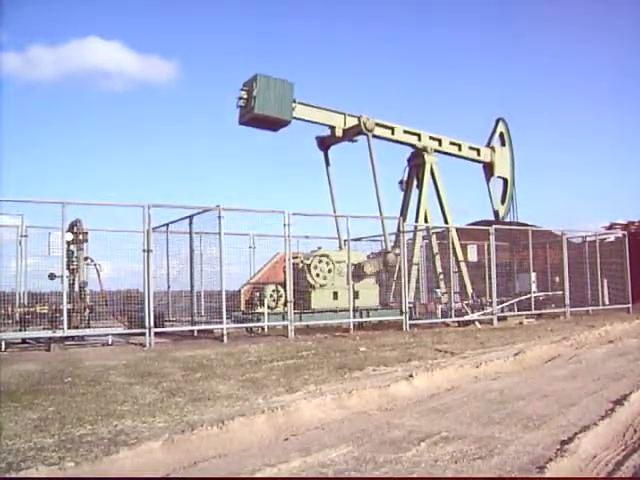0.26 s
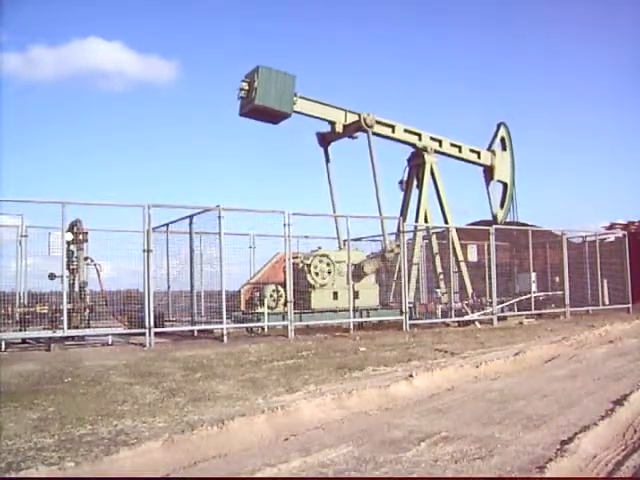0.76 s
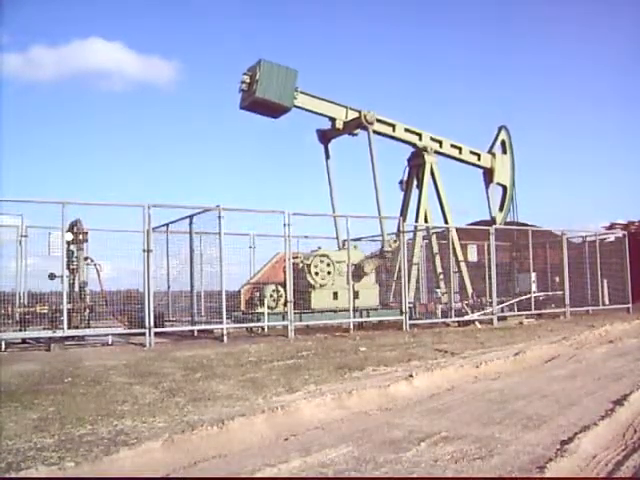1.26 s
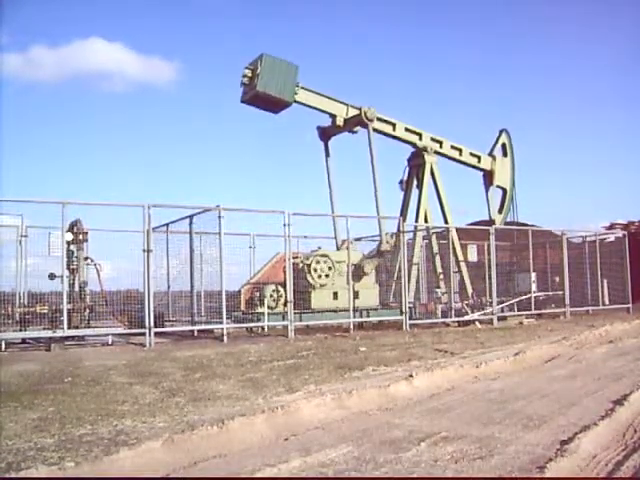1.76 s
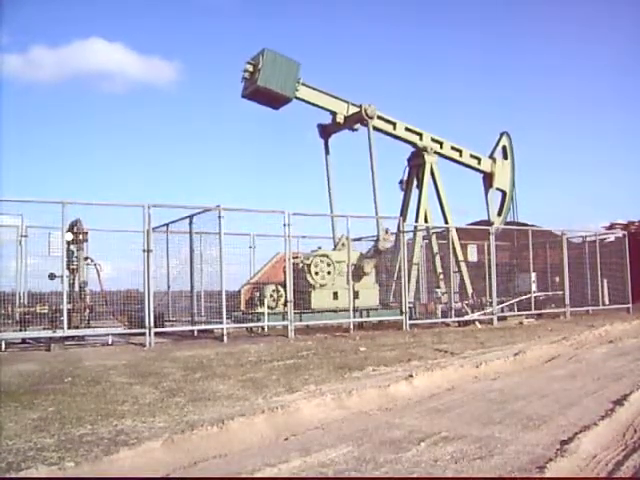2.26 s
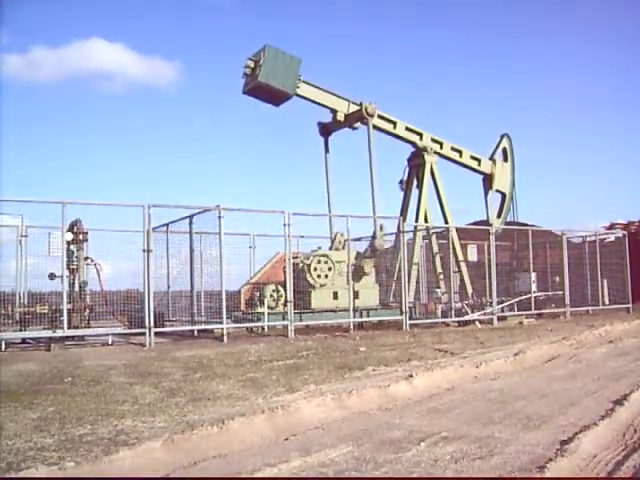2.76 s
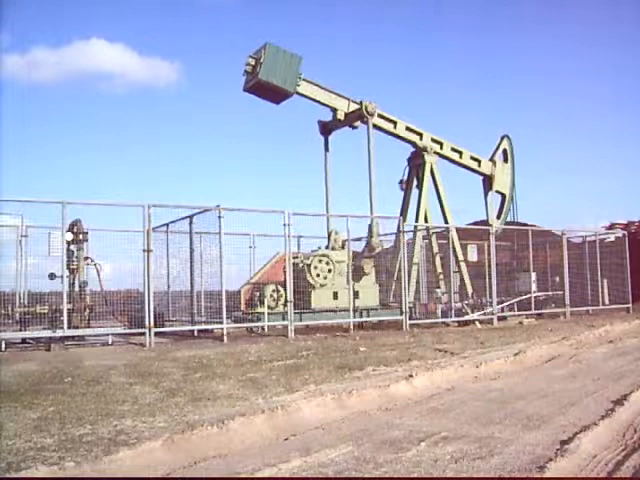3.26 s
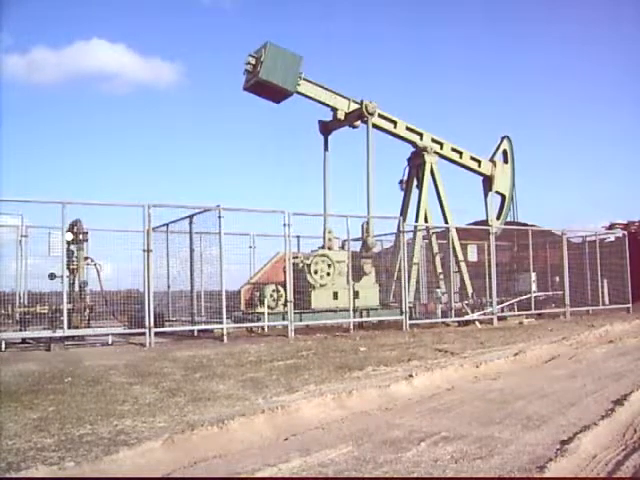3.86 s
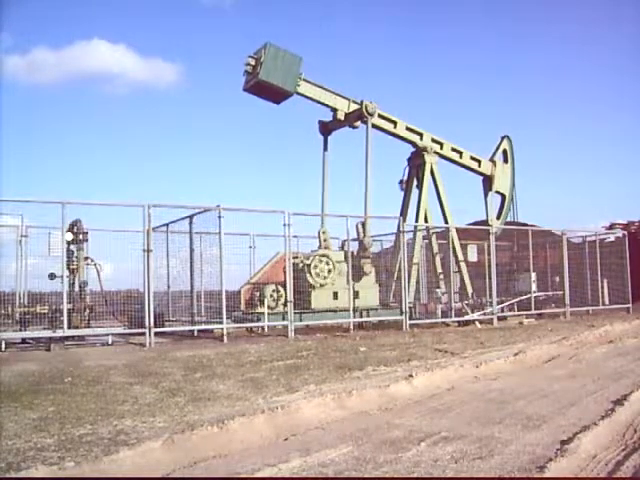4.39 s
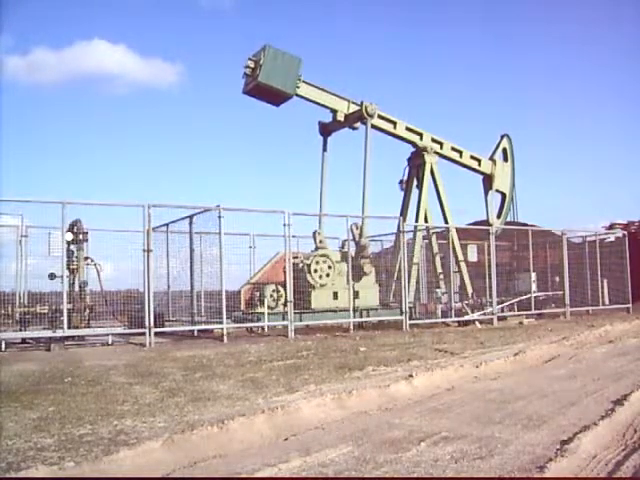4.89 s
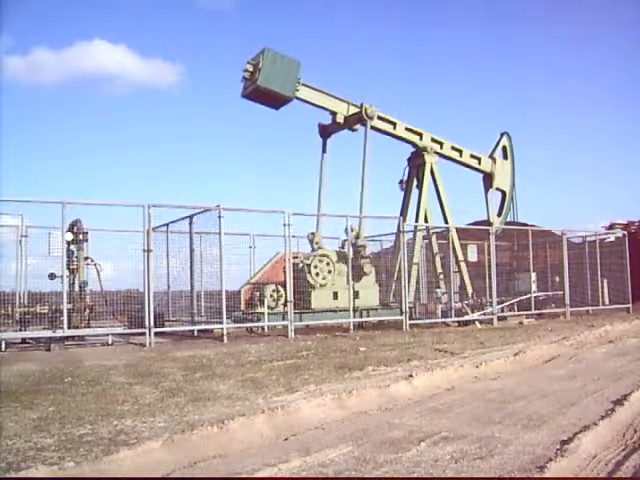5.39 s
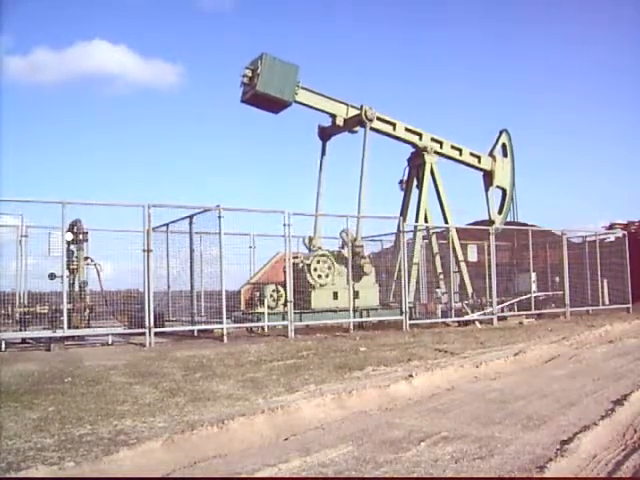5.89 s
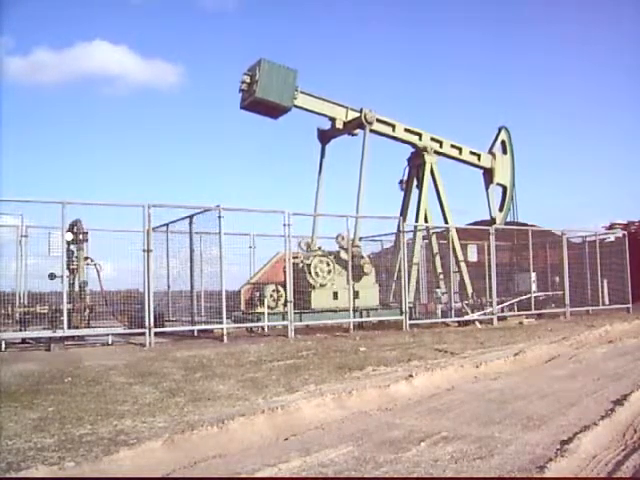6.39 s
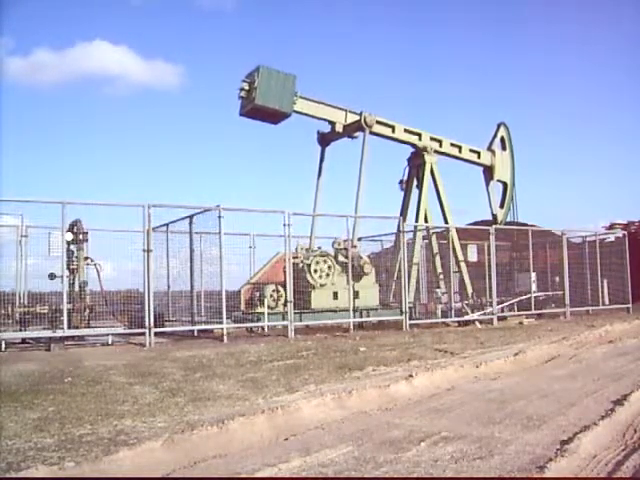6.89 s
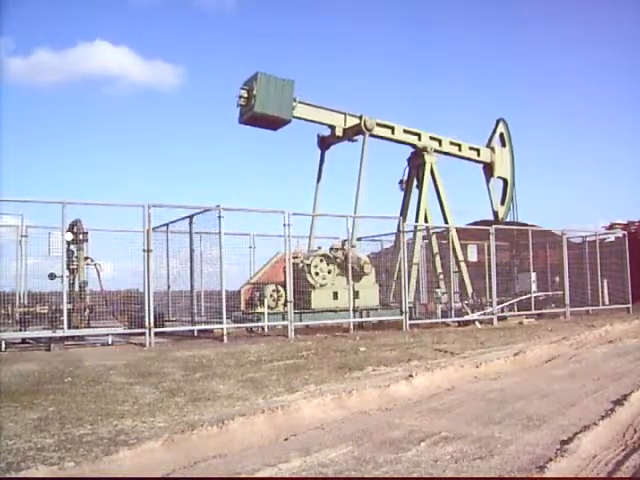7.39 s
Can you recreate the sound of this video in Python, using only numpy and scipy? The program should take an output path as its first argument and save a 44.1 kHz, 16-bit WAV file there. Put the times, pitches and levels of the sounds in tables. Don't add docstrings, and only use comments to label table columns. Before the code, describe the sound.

A pumpjack engine idles in rapid, even knocks over a gear whine and exhaust wash, while wind thumps the microphone and a lark whistles faintly.

```python
import sys
import numpy as np
from scipy import signal
from scipy.fft import rfft, irfft
from scipy.io import wavfile
from scipy.ndimage import uniform_filter1d

SR = 44100
rng = np.random.default_rng(int(sys.argv[2]) if len(sys.argv) > 2 else 0)


def wav_out(sig):
    wavfile.write(sys.argv[1], SR, np.round(np.clip(np.atleast_2d(sig).T, -1, 1) * 32767).astype(np.int16))


def field_ratio(decibels):
    return 10 ** (np.asarray(decibels, dtype=float) / 20)


N = 337365
T = np.arange(N) / SR

CYCLE_START_S, CYCLE_S, SLOWING_S = -.00098, .155957, 1.8e-7

# middle in seconds, level in dB, pitch in Hz.
LARK_NOTES = [(0.712, -57, 4272), (0.93, -55, 4988), (0.975, -62.4, 4650), (1.018, -62, 6201),
              (1.034, -56, 4630), (1.077, -59, 4960), (1.442, -59, 4851), (1.49, -61.4, 4658),
              (1.535, -72, 4851), (2.12, -58, 5000), (2.519, -63, 6200), (2.528, -63, 4272),
              (2.635, -59, 5016), (2.791, -60, 5043), (4.324, -57.5, 4382), (4.456, -53, 3445),
              (4.51, -61, 5060), (5.569, -61, 6118), (5.71, -56, 4272), (5.909, -60, 5016),
              (6.025, -62, 6229), (6.156, -64.9, 6200), (6.619, -56, 4272), (6.683, -62.0, 4940)]
TRILL_HZ = [4360, 4650, 4930, 6180]
# time in seconds, level in dB.
BREEZE = [(0.0, -20.5), (0.3, -34), (1.11, -32), (2.36, -40.5), (3.81, -37.5), (4.71, -42), (7.65, -36)]
# middle in seconds, length in seconds, level in dB.
GUSTS = [(0.044, .04, -23), (0.114, .14, -21.5), (0.301, .1, -24.5), (0.836, .14, -23.5),
         (.94, 0.042, -27.5), (1.025, .06, -26), (1.249, 0.23, -30), (1.389, 0.079, -29),
         (1.488, 0.071, -29), (1.954, 0.12, -24), (2.036, .1, -24.5), (2.178, .08, -32),
         (2.526, 0.15, -30.5), (2.742, .07, -30), (2.91, .1, -24), (3.036, 0.19, -24.5), (3.302, 0.1, -34),
         (3.58, .16, -25.5), (3.715, 0.089, -19.5), (3.856, 0.065, -27.5), (3.958, 0.081, -29),
         (4.081, .12, -24.5), (4.317, 0.08, -29), (4.471, 0.042, -31)]
# frequency in Hz, level in dB per Hz.
WIND_COLOUR = [(8, -30), (26, 0.5), (46, 1), (65, -6.5), (100, -8), (200, -13.5), (400, -26), (800, -60)]
# time in seconds, level in dB, pitch in Hz.
POPS = [(0.003, -11.5, 66.8), (0.07, -12.5, 514), (0.072, -22.5, 950), (0.076, -5.5, 213),
        (0.062, -11, 110), (0.089, -10.5, 90.4), (0.1, -7.5, 307), (0.115, -13, 54), (0.245, -18, 156),
        (0.313, -17.5, 39.5), (0.814, -16.5, 230), (0.852, -23, 283), (1.193, -19.5, 149),
        (1.216, -17.5, 118), (1.818, -15.5, 207), (1.977, -17, 194), (1.977, -21, 487), (1.993, -18, 271),
        (2.028, -22, 85.5), (3.018, -15.5, 109), (3.055, -19, 60), (3.594, -22.5, 152), (3.622, -14, 350),
        (3.696, -17, 194), (3.701, -19.5, 360), (3.72, -23, 306), (3.72, -21.5, 78), (4.082, -17.5, 160),
        (4.108, -21.5, 239), (4.12, -18.5, 486)]
# time in seconds, peak in dB, build-up and recovery in seconds.
SLAPS = [
    (0.0691, -3, 0.002, 0.0008),
    (0.0722, 3.5, 0.002, 0.0018),
    (0.1024, -7, 0.0013, 0.0013),
    (0.7864, -4, 0.0025, 0.0052),
    (2.923, -4.5, 0.0023, 0.0091),
    (3.6266, -5.5, 0.005, .008),
    (4.123, -11.5, 0.0045, 0.0058),
]
# frequency in Hz, level in dB per Hz.
WASH_COLOUR = [(25, -56), (60, -58), (100, -61), (130, -57), (200, -57), (400, -61.5), (560, -63),
               (800, -68), (1000, -73.5), (1320, -80), (1450, -85), (2100, -87), (3000, -88), (5000, -90.5),
               (7500, -95.5)]
# milliseconds into the cycle, level in dB.
PUFF = [(0, 0), (40, -1), (60, -1.45), (90, -0.5), (128, -1.5), (134, 0.5), (156, -2.5)]
# time in seconds, level in dB.
GEAR_LEVEL = [(0, -45), (.5, -48.8), (1.4, -45.5), (2.05, -47.3), (3.25, -42.5), (4.25, -43.8), (5, -48),
              (5.6, -45.3), (6.1, -48.3), (7, -44.2), (7.65, -43.5)]
# frequency in Hz, width in Hz, level in dB.
HOUSING = [(129.5, 6.7, -44.5), (194, 7, -53), (468.7, 10, -51.5), (749, 6.9, -46.5), (1491, 33, -62.5),
           (2072, 40, -70.5), (2752, 150, -63.5), (4800, 120, -71)]
# start in seconds, length in seconds, pitch in Hz, level in dB.
SWELLS = [
    (4.34, 0.16, 1920, -60),
    (4.49, 0.091, 1890, -57),
    (4.57, 0.053, 1940, -56),
    (4.67, 0.075, 1920, -54),
    (6.84, 0.086, 147.5, -38),
    (6.91, 0.07, 149, -38.5),
    (7.2, 0.11, 140.5, -39),
    (7.34, 0.088, 146.6, -34.5),
    (7.48, 0.1, 144.4, -32.5),
]
# time in seconds, level in dB, seconds to fade by 60 dB.
CLANKS = [
    (1.2765, -43, .13),
    (1.3758, -37.5, .17),
]
# frequency in Hz, level in dB.
LINK_MODES = [(1770, 3.5), (2270, 3), (2970, -3), (3480, -1.5), (4220, -6.5), (5200, -11.5), (6720, -9.5)]
# milliseconds into the cycle, level in dB, block ring in Hz,
# head ring in dB, exhaust thump in Hz.
FIRINGS = [
    (7, -35, 790, -41, 260),
    (31, -26.5, 630, -41, 340),
    (55, -30, 800, -46, 270),
    (81, -30, 960, -43, 230),
    (106, -31, 700, -46, 250),
    (133, -35, 1020, -45, 430),
]
# milliseconds into the cycle, level in dB, ring in Hz.
TAPPETS = [
    (22, -31, 400),
    (82, -32, 310),
    (91, -38, 1080),
    (100, -33, 1030),
    (108, -30, 470),
    (151, -42, 1230),
    (0, -36, 930),
    (152, -29, 230),
]
# frequency in Hz, level in dB per Hz.
RATTLE_COLOUR = [(60, -28), (150, -8), (300, -4.5), (800, -4.5), (1200, -16), (1500, -30.5), (2100, -28),
                 (3000, -41), (5000, -65)]
# multiple of the cycle rate, peak in dB.
ORDER_DB = [(24, -41.5), (38, -40.2), (39, -42.8), (51, -41.8), (59, -40.2), (68, -42.8), (99, -47.2),
            (100, -44.9), (109, -41.4), (115, -43.2), (120, -43.9), (130, -45.0), (132, -44.6),
            (136, -46.0), (144, -50.1), (156, -52.4), (162, -49.2), (171, -51.0), (190, -55.1),
            (191, -56.2), (196, -55.6), (197, -56.0), (225, -67.8), (231, -66.1), (268, -67.0),
            (275, -68.3), (317, -66.3), (319, -67.2), (325, -67.6)]
# frequency in Hz, level in dB.
ELECTRONIC_WHINE = [(7790, -73.5), (7892, -79.5)]
# frequency in Hz, level in dB.
ROLL_OFF = [(20, -1), (7000, 1), (7600, 1), (8000, -1.5), (8400, -11), (8800, -25.5), (9100, -53.5)]


def evened(x):
    return x / np.sqrt(np.mean(x ** 2) + 1e-20)


def read(points, hz):
    f, value = np.transpose(points)
    return np.interp(np.log(hz + 1), np.log(f + 1), value)


def colour(x, points):
    x = np.pad(x, 2048, "reflect")
    gain = field_ratio(read(points, np.fft.rfftfreq(len(x), 1 / SR)))
    return irfft(rfft(x) * gain, len(x))[2048:-2048]


def smooth_noise(size):
    return evened(uniform_filter1d(rng.standard_normal(N), size=size))


def add(mix, s, sound):
    at = round(s * SR)
    sound = sound[max(-at, 0):]
    part = mix[max(at, 0):][:len(sound)]
    part += sound[:len(part)]


def fuzzy(hz, width):
    r = np.exp(-np.pi * width / SR)
    noise = rng.standard_normal(N) + 1j * rng.standard_normal(N)
    slow = signal.lfilter([1], [1, -r], noise)
    return evened((slow * np.exp(2j * np.pi * hz * T)).real)


def burst(hz, rise_s, fall_s, phase):
    t = np.arange(-3 * rise_s, 4 * fall_s, 1 / SR)
    shape = np.exp(-.5 * (t / np.where(t < 0, rise_s, fall_s)) ** 2)
    return shape * np.cos(2 * np.pi * hz * t + phase), -t[0]


def cycle_share():
    k = np.arange(-1, N / SR / CYCLE_S + 2)
    starts = CYCLE_START_S + CYCLE_S * k + SLOWING_S * k ** 2
    return np.interp(T, starts, k) % 1


def lark():
    faint = []
    for when, b, pick in rng.random((60, 3)):
        hz = TRILL_HZ[int(pick * len(TRILL_HZ))] * (1.1 + 0.018 * b)
        faint.append((N / SR * when, -66 - 4 * b, hz))
    out, t = np.zeros(N), np.arange(-.016, .016, 1 / SR)
    for s, db, hz in [*LARK_NOTES, *faint]:
        slide = hz * (1 + rng.uniform(-0.45, 0.89) * t)
        whistle = np.sin(2 * np.pi * np.cumsum(slide) / SR)
        add(out, s + t[0], field_ratio(db + 3) * np.hanning(len(t)) * whistle)
    return out


def wind():
    gusts = np.zeros(N)
    for s, length, db in GUSTS:
        add(gusts, s - length / 2, field_ratio(db) * np.sqrt(np.hanning(round(length * SR))))
    force = field_ratio(np.interp(T, *np.transpose(BREEZE)) + 1.0) + gusts
    lumpy = rng.standard_normal(N) * field_ratio(3.3 * smooth_noise(1200))
    out = force * evened(colour(lumpy, WIND_COLOUR))
    eddies = [(s, field_ratio(db + 2.5), hz) for s, db, hz in POPS]
    eddies_per_s, low_hz, high_hz = 90, 150, 700
    for when, b, c in rng.random((round(eddies_per_s * N / SR), 3)):
        size = gusts[int(when * N)] * field_ratio(-1 - 8.0 * b - 4.6 * c)
        eddies.append((when * T[-1], size, low_hz * (high_hz / low_hz) ** c))
    for s, size, hz in eddies:
        push, lead = burst(hz, 0.0022 + 0.027 / hz, 0.0026 + 0.16 / hz, rng.uniform(0, 2 * np.pi))
        add(out, s - lead, size * push)
    return out


def slaps():
    out, t = np.zeros(N), np.arange(-.07, .07, 1 / SR)
    for s, db, build_s, back_s in SLAPS:
        drop = -np.tanh(t / (0.28 * build_s))
        fade = np.exp(-abs(t) / np.where(t < 0, build_s, back_s))
        add(out, s + t[0], field_ratio(db) * drop * fade)
    return out


def wash():
    frames, bins = N // 128 + 5, 257
    a, b, patches = rng.standard_normal((frames, bins, 3)).T
    patches = uniform_filter1d(patches, size=6, axis=0)
    patches = evened(uniform_filter1d(patches, size=20, axis=1))
    flicker = rng.standard_normal(frames)
    spectra = (a + 1j * b) * field_ratio(1.02 * patches + 1.0 * flicker)
    noise = signal.istft(spectra, nperseg=512, noverlap=384)[1][:N]
    noise = evened(noise) * np.sqrt(SR / 2)
    low = signal.sosfiltfilt(signal.butter(2, 1400, fs=SR, output="sos"), noise)
    ms = 1000 * CYCLE_S * cycle_share()
    breath = field_ratio(np.interp(ms, *np.transpose(PUFF)))
    return colour(low + (noise - low) * breath, WASH_COLOUR)


def gearbox():
    hz = 598.9 + .6 * smooth_noise(9000)
    whine = np.sqrt(2) * np.sin(2 * np.pi * np.cumsum(hz) / SR)
    hum = sum(field_ratio(db) * fuzzy(hz, width) for hz, width, db in HOUSING)
    return whine * field_ratio(np.interp(T, *np.transpose(GEAR_LEVEL))) + hum


def bearing_and_frame():
    out = np.zeros(N)
    for s, length, hz, db in SWELLS:
        size = round(length * SR)
        noise = rng.standard_normal((2, size))
        drift, flicker = uniform_filter1d(noise, size=round(30 * SR / hz) // 2, axis=1)
        shape = np.hanning(size) ** 0.65 * field_ratio(db + 5 + 3.5 * evened(flicker))
        wavering_hz = hz * (1 + .012 * evened(drift))
        add(out, s, shape * np.sin(2 * np.pi * np.cumsum(wavering_hz) / SR))
    return out


def loose_link():
    out, t = np.zeros(N), np.arange(SR // 3) / SR
    for s, db, t60 in CLANKS:
        modes = sum(field_ratio(d) * np.sin(2 * np.pi * (hz * t + rng.random())) for hz, d in LINK_MODES)
        scatter = colour(rng.standard_normal(len(t)), [(900, -50), *LINK_MODES, (9000, -31.5)])
        ring = 0.48 * evened(modes) + 0.59 * evened(scatter)
        attack = np.minimum(t / .001, 1)
        add(out, s - .004, field_ratio(db - 60 * t / t60) * ring * attack)
    return out


def valve():
    since = (cycle_share() * CYCLE_S - .1327) % CYCLE_S
    later = (since - .078) % CYCLE_S
    tick = field_ratio(-34.5) * np.exp(-since / .0013) * np.sin(2 * np.pi * 1850 * since)
    chuff_colour = [(1000, -33.0), (1500, 5.5), (2050, 10.5), (2500, -12.5), (5000, -8.0), (8000, -26.5)]
    chuff = evened(colour(rng.standard_normal(N), chuff_colour))
    fade = np.exp(-since / .04) + field_ratio(-6) * np.exp(-later / .02)
    return tick + field_ratio(-50.5) * chuff * fade


def knocks():
    rows = list(TAPPETS)
    for ms, db, block_hz, head_db, thump_hz in FIRINGS:
        rows.append((ms, db, block_hz))
        rows.append((ms + 11, -30, thump_hz))
        rows += [(ms + lag_ms, head_db, 1270) for lag_ms in (1, 6)]
    return rows


def engine():
    size = round(CYCLE_S * SR)
    three = np.zeros(3 * size)
    for ms, db, hz in knocks():
        ring, lead = burst(hz, .0012 + .5 / hz, .0025 + .7 / hz, rng.uniform(0, 2 * np.pi))
        add(three, CYCLE_S + ms / 1000 - lead, field_ratio(db - 0.5) * ring)
    ring, lead = burst(860, .006, .007, 0)
    add(three, CYCLE_S + .004 - lead, field_ratio(-34.5) * ring)
    cycle = three.reshape(-1, size).sum(axis=0)
    rattle_gain = field_ratio(read(RATTLE_COLOUR, np.fft.rfftfreq(size, 1 / SR)))
    rattle = irfft(rfft(rng.standard_normal(size)) * rattle_gain, size)

    orders = rfft(cycle + field_ratio(-36) * evened(rattle)) / (size / 2)
    k, db = np.transpose(ORDER_DB)
    ceiling = field_ratio(np.interp(np.arange(len(orders)), k, db) - 3)
    height = np.minimum(abs(orders), ceiling)
    height[k.astype(int)] = field_ratio(db)
    cycle = irfft(height * orders / (abs(orders) + 1e-12) * size / 2, size)

    load = smooth_noise(5000)
    turns = np.interp(cycle_share(), np.arange(size) / size, cycle, period=1)
    return turns * field_ratio(0.65 * load)


def scene():
    air = lark() + wind() + slaps()
    machine = wash() + gearbox() + bearing_and_frame() + loose_link() + valve() + engine()
    return (air + machine)[None]


def top_cut(x):
    return signal.sosfilt(signal.butter(12, 9030, fs=SR, output="sos"), x)


def record(dry):
    power_db = 10 * np.log10(abs(uniform_filter1d(dry[0] ** 2, size=400)) + 1e-12)
    fall = T * 6.0
    held_db = np.maximum.accumulate(power_db + fall) - fall
    over_db = np.maximum(held_db + 5, 0)
    late_db = np.pad(over_db, (1500, 0))[:N]
    fade_in = np.minimum(T / 0.0023, 1)
    x = fade_in * dry[0] / field_ratio(0.29 * late_db)
    x = x + sum(field_ratio(db + 1.5) * np.sin(2 * np.pi * hz * T) for hz, db in ELECTRONIC_WHINE)
    half_rate_hz = 8000
    x = colour(x, [(20, 0), (half_rate_hz - 1, 0), (half_rate_hz, -99)])
    mirrored = x * (1 + 2 * np.cos(2 * np.pi * 2 * half_rate_hz * T))
    overloaded = np.clip(colour(mirrored, ROLL_OFF), -.705, .705)
    return top_cut(overloaded[None])


dry = scene()
out = record(dry)
wav_out(out)
```